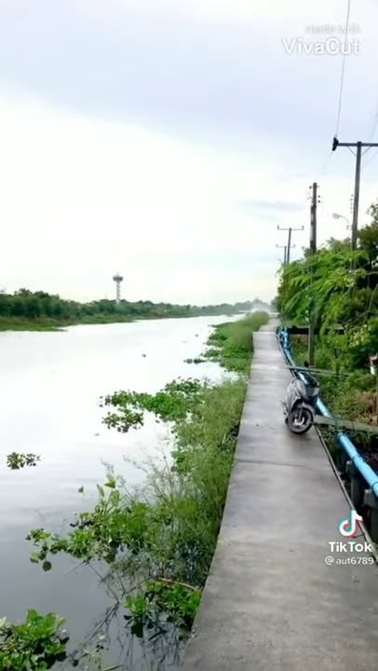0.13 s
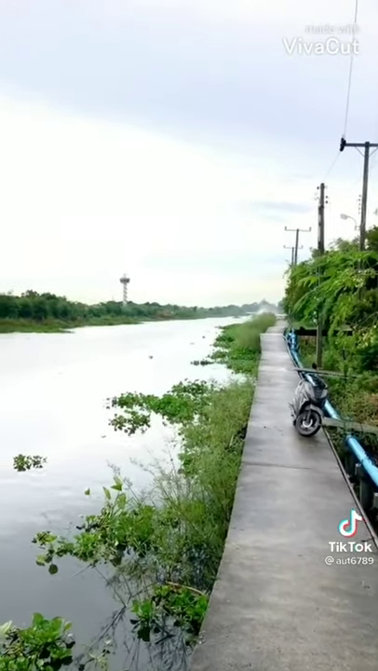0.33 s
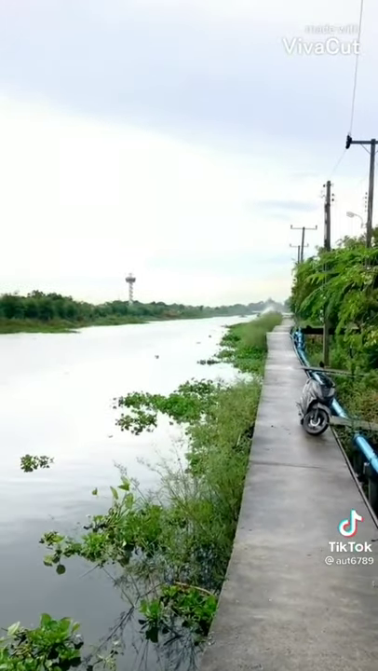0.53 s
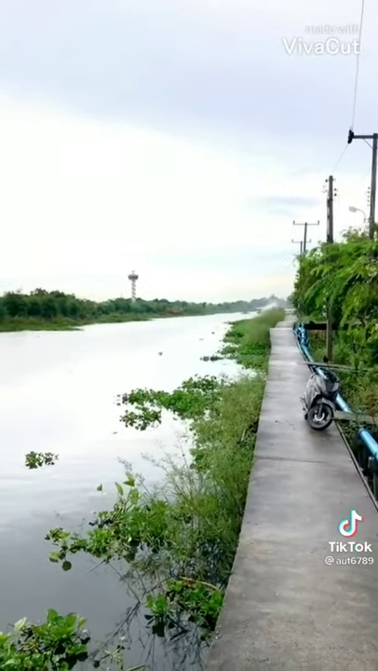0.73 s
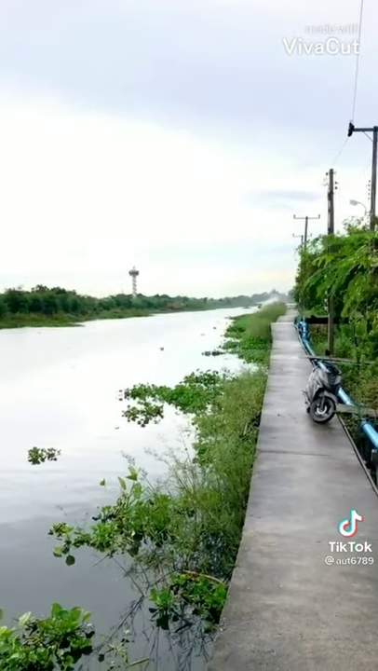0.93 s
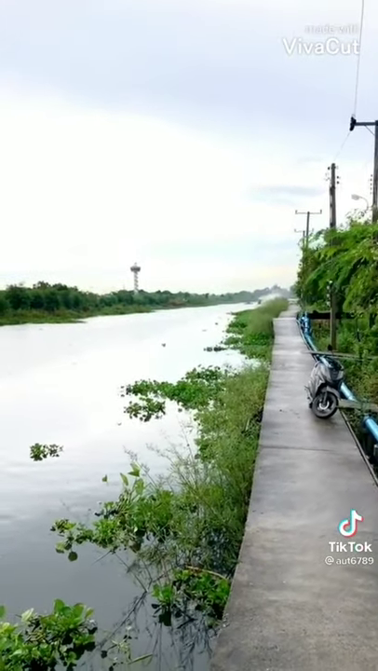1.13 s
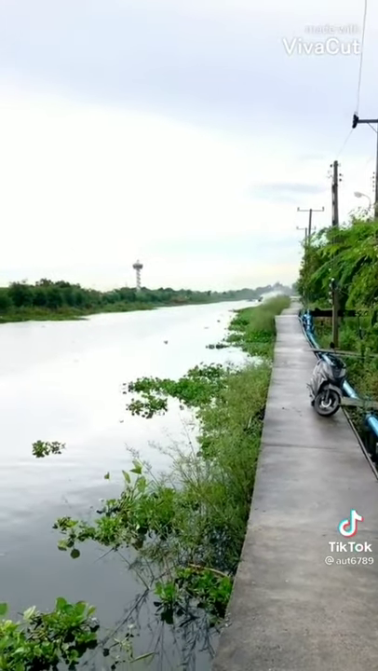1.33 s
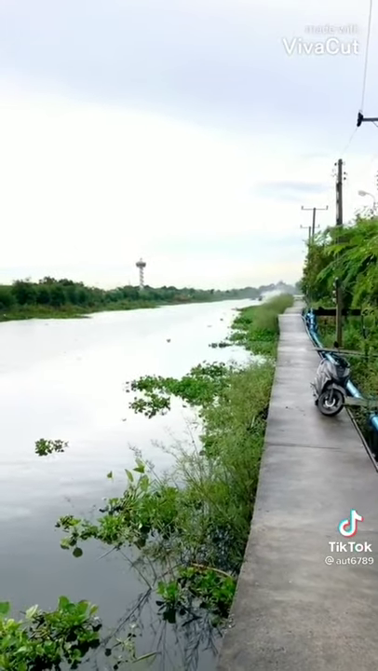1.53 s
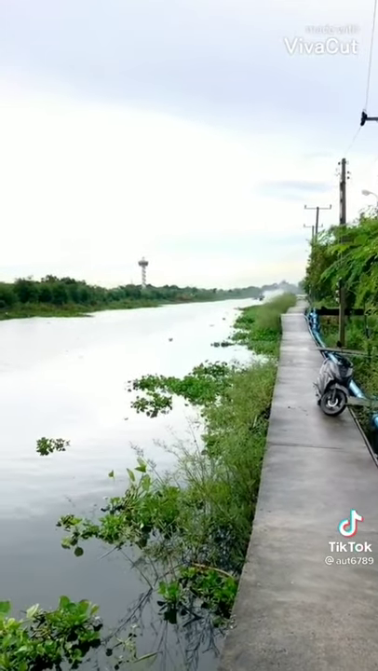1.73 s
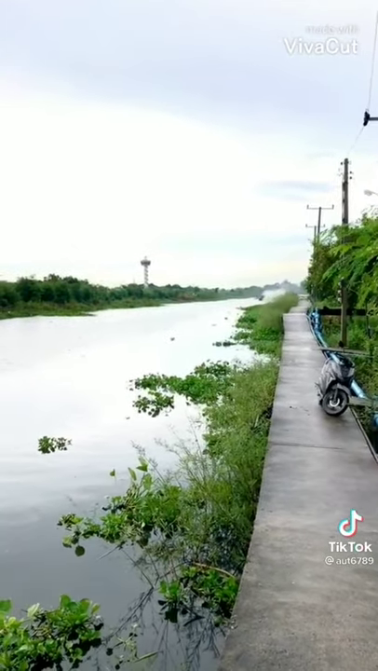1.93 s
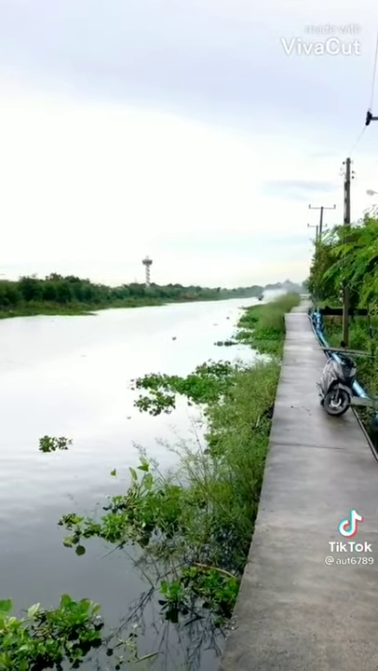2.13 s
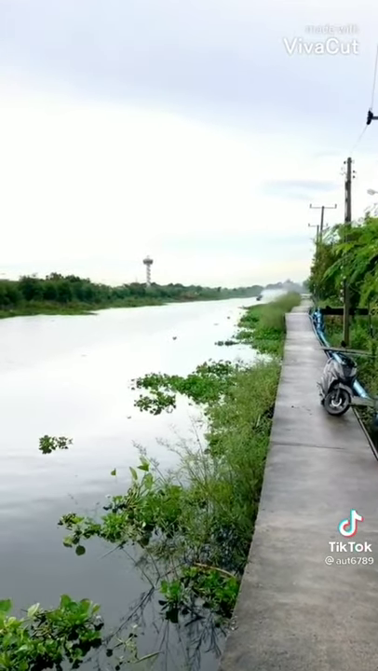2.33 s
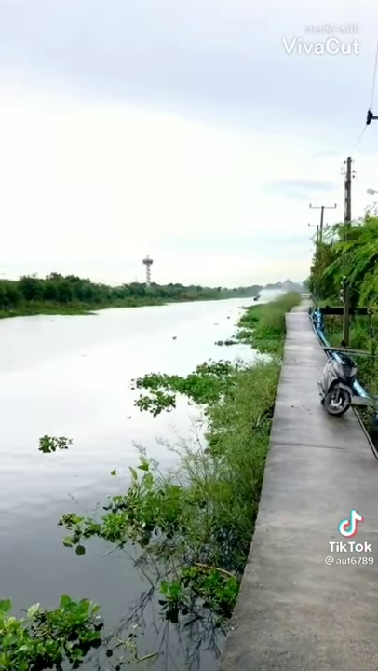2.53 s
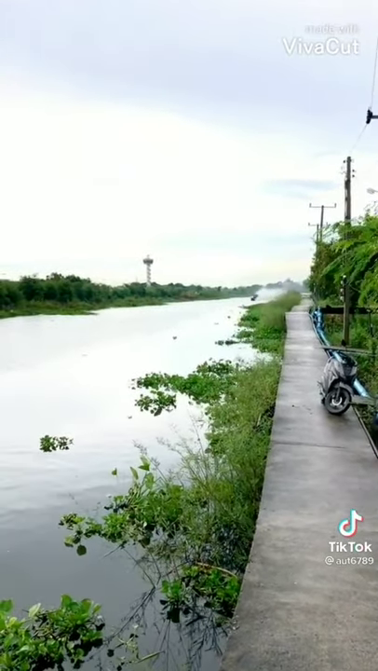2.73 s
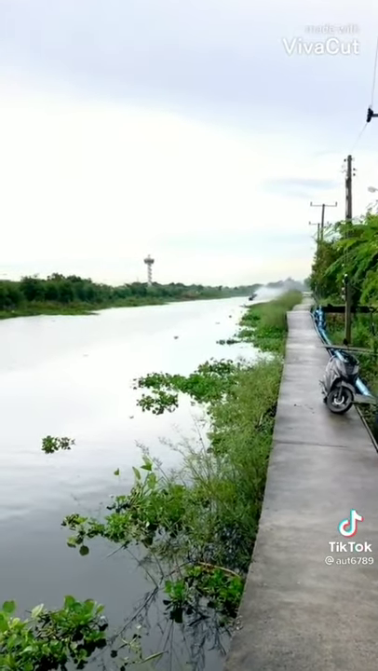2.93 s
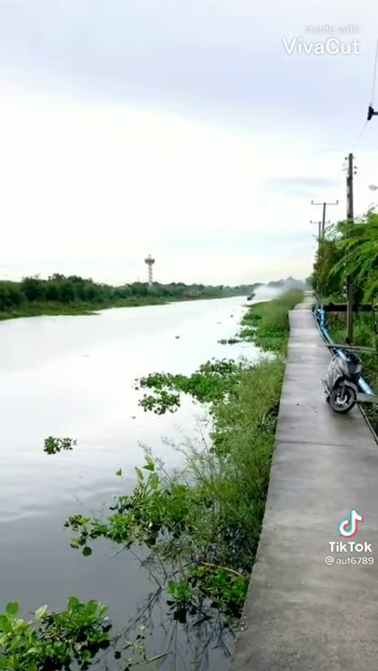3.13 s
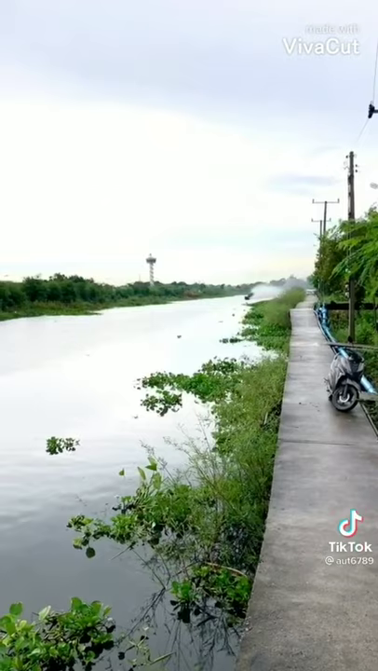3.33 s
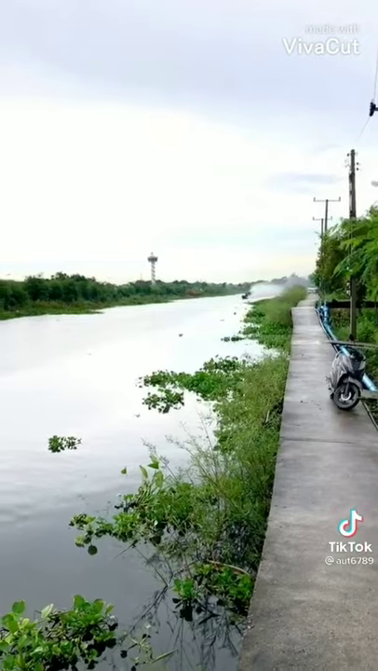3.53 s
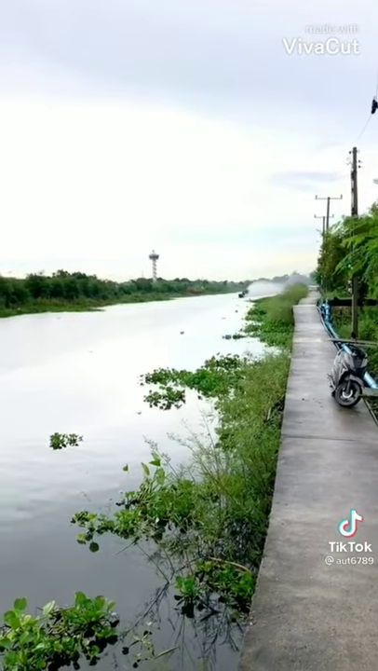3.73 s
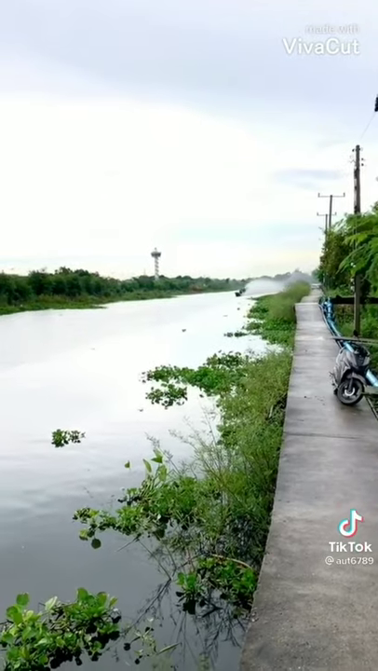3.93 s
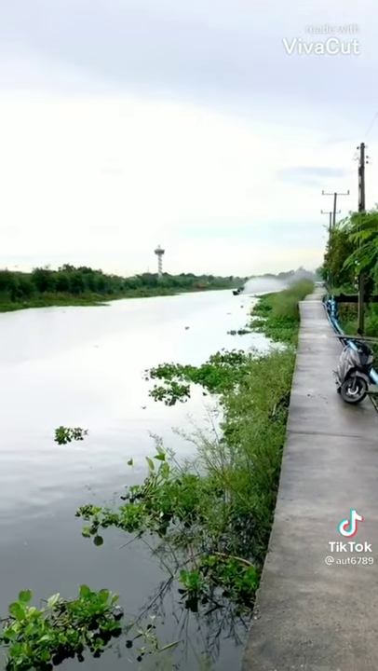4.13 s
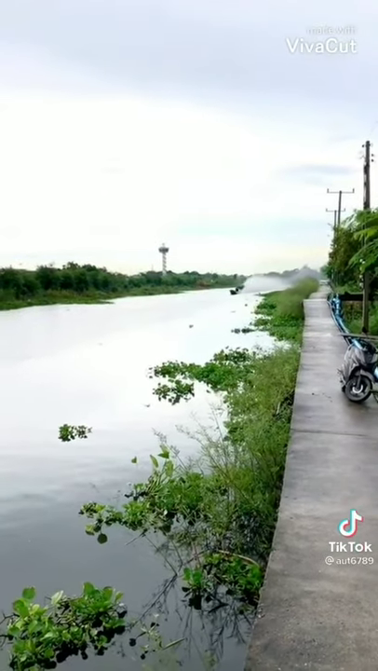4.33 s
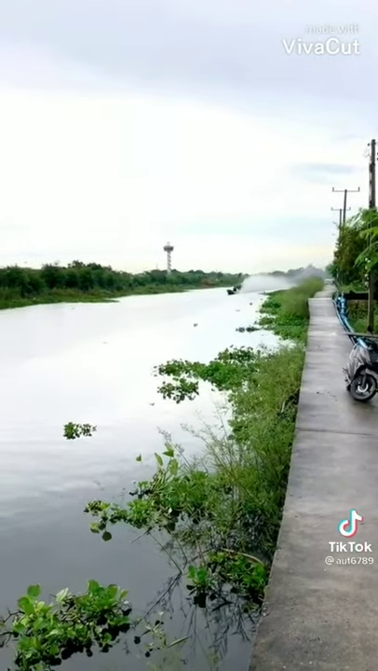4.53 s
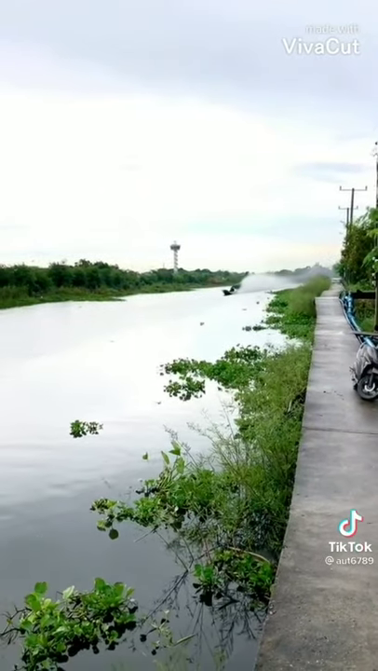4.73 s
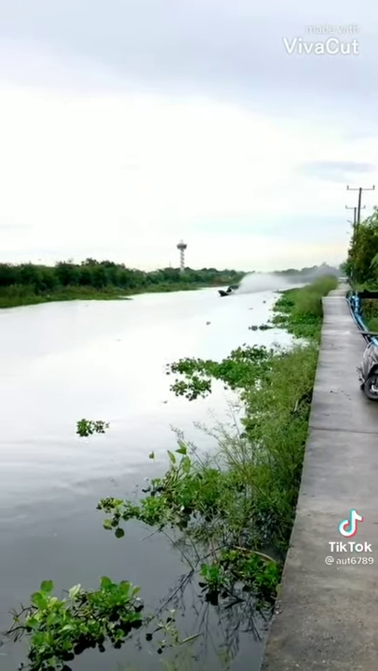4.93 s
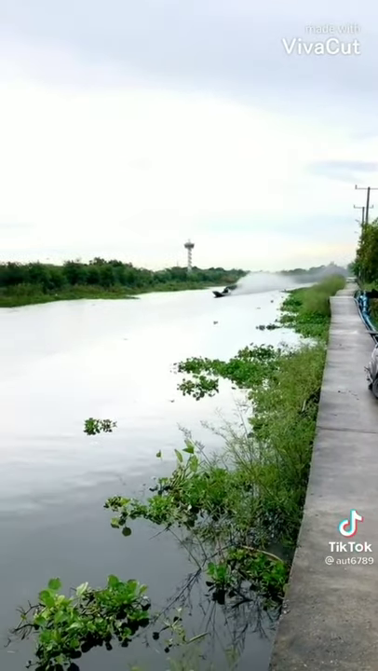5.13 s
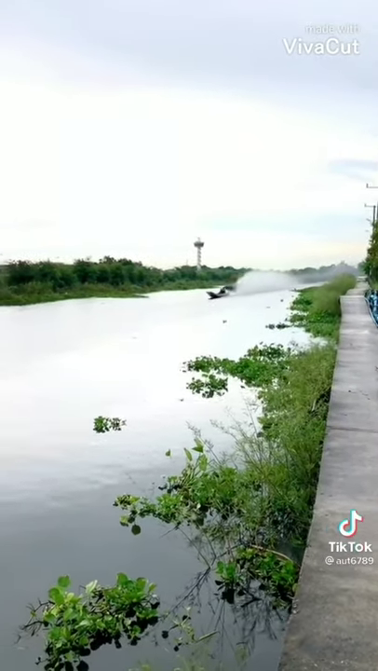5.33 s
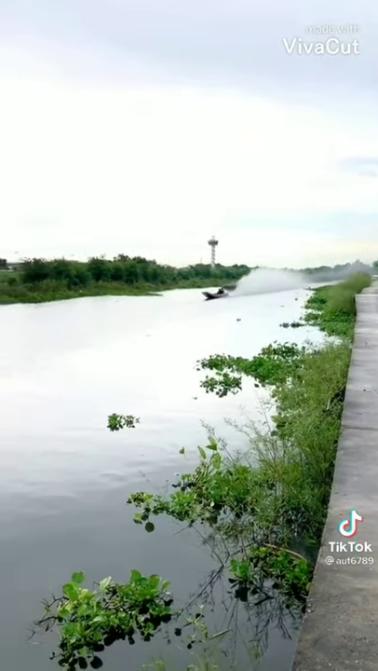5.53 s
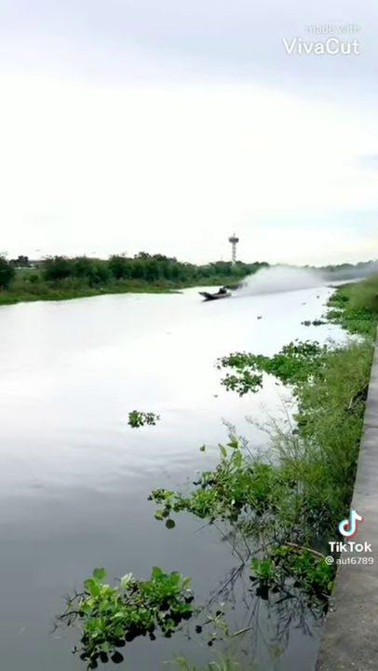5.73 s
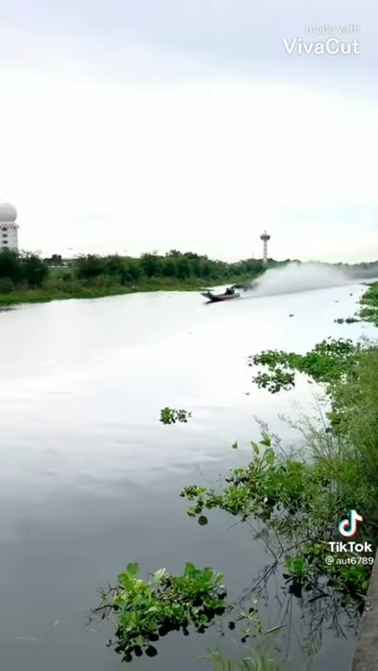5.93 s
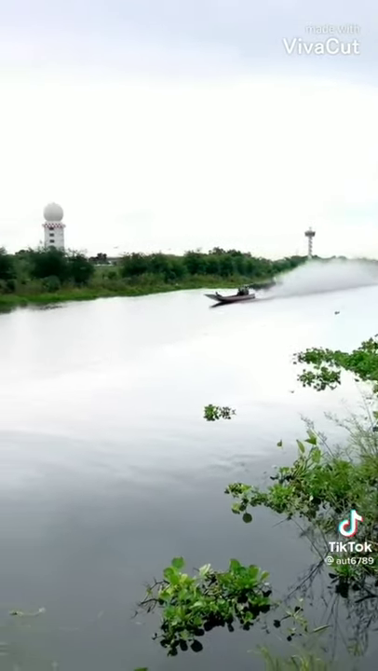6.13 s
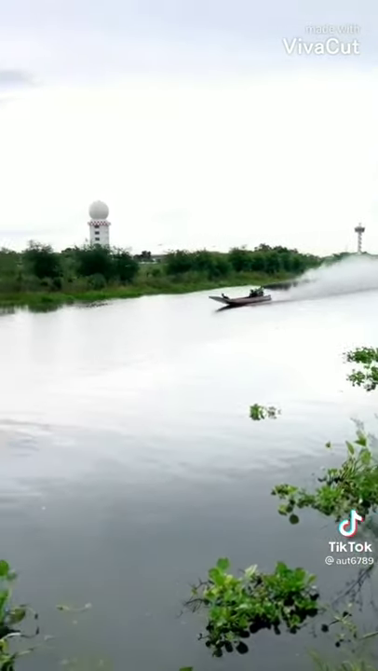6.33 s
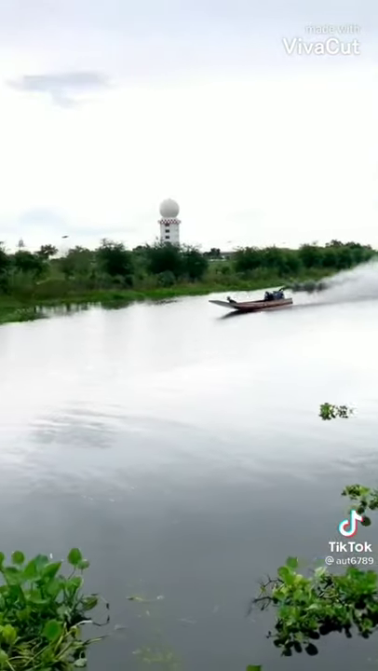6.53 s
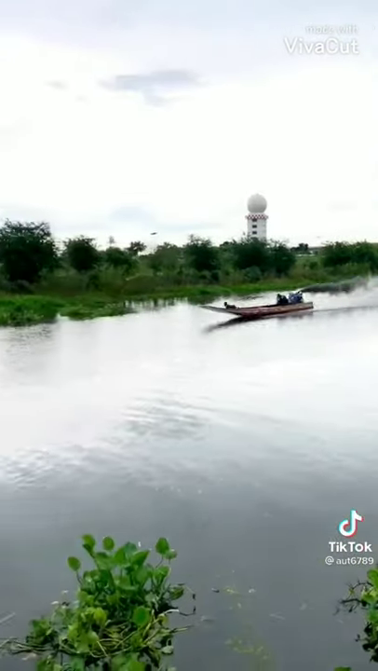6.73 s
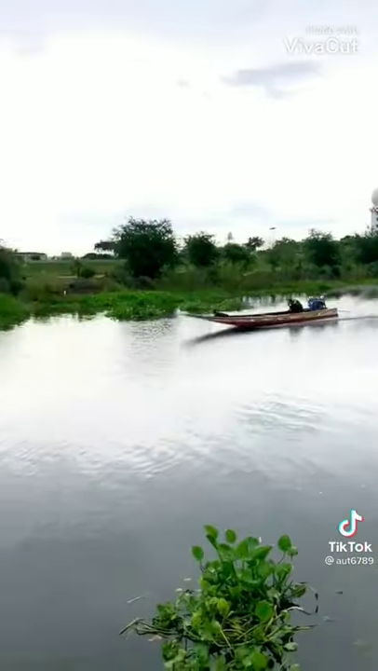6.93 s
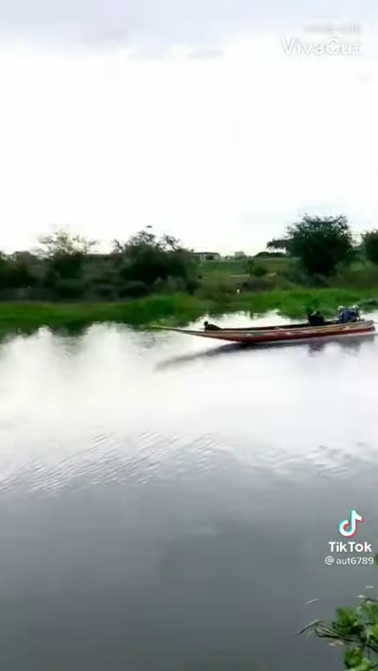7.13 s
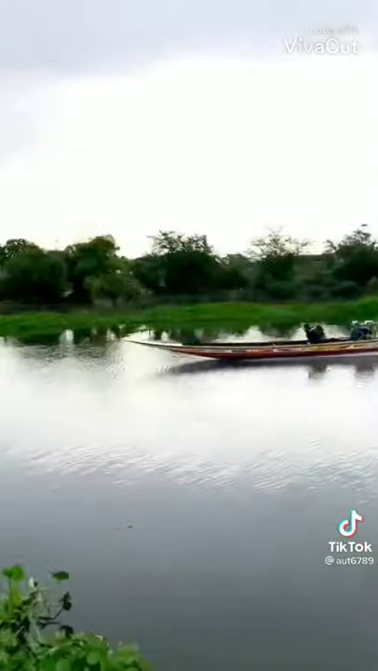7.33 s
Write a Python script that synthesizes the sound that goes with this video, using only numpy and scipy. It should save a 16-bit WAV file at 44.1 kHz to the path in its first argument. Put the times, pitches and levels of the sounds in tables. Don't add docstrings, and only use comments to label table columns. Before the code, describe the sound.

Outdoors on a canal bank, a phone microphone hears a few tiny leaf ticks and a faint, steady engine drone far off. The pitch creeps upward as a fast boat approaches. Thin turbo whistles glint through midway, then vanish. Roar and hissing spray swell, brighten and flutter until the boat passes close, very loud, its pitch sagging slightly at the end.

```python
import sys
import numpy as np
from scipy import signal
from scipy.fft import rfft, irfft
from scipy.io import wavfile
from scipy.ndimage import uniform_filter1d

SR = 44100
rng = np.random.default_rng(int(sys.argv[2]) if len(sys.argv) > 2 else 0)


def how_loud(loudness_db):
    steps = np.asarray(loudness_db, float) / 20
    return 10 ** steps


def digitize_waveform(pressure):
    field = np.atleast_2d(pressure).T
    bounded = np.clip(field, -1, 1)
    quanta = np.round(bounded * 32767).astype(np.int16)
    wavfile.write(sys.argv[1], SR, quanta)


N = 329868

# start in seconds, level in dB.
LEAF_TICKS = [
    (0.1376, -56),
    (0.6294, -68),
    (0.9055, -54),
    (1.2492, -66),
]
# time in seconds, firing rate in Hz, loudness at the bank in dB.
APPROACH = [(0, 158.7, -55), (.4, 162.2, -54), (.8, 166.8, -53.5), (1.5, 172.8, -51.5), (2.2, 178, -50),
            (3, 185.7, -47.5), (3.7, 191.9, -43.5), (4.3, 194, -40), (4.65, 196.9, -36),
            (4.9, 198.7, -32.5), (5.15, 197.5, -29.5), (5.8, 197.2, -27), (6.4, 197.1, -22),
            (6.7, 196.9, -18.5), (6.95, 195, -18.5), (7.15, 190.5, -19), (7.35, 187.3, -17),
            (7.48, 187.2, -18.5)]
# centre in seconds, half length in seconds, dB.
HULL_SLAPS = [(4.33, .02, 0.5), (4.66, .04, 1.5), (5.13, 0.046, 2), (5.28, .05, -1), (6.47, .03, -1.5),
              (6.79, .03, 2.5), (6.83, 0.013, -3.5), (6.86, .012, 2), (6.96, 0.017, -1), (7.31, 0.02, 0),
              (7.35, 0.005, -4), (7.38, 0.011, -2.5), (7.44, 0.018, -1)]

# time in seconds, shaft rate in Hz.
TURBO_SHAFT = [
    (.6, 2450),
    (1.8, 2532),
    (2.4, 2573),
    (3.0, 2602),
    (4.2, 2634),
    (5.15, 2640),
    (5.3, 2626),
    (5.8, 2624),
]
# time in seconds, whistle level in dB.
INTAKE_FACING = [
    (.6, -88),
    (2.1, -77),
    (3.3, -60),
    (3.92, -58),
    (4.05, -48.5),
    (4.6, -46.5),
    (5.05, -36.5),
    (5.5, -40),
    (5.62, -55),
    (5.8, -79),
]
# centre in seconds, half length in seconds, lift in dB.
WHISTLE_GLINTS = [
    (4.08, .06, 7),
    (4.35, .15, -4),
    (4.64, 0.039, 7),
    (4.82, .06, 7),
    (4.98, .04, 5),
    (5.13, 0.029, 13),
    (5.3, 0.021, 8),
    (5.5, .03, 9),
]

# frequency in Hz, level in dB per Hz.
FAR_SPRAY = [(700, -23), (1150, 1.5), (1400, 0.5), (1650, 0), (1900, -2.5), (2150, -4.5), (2550, -2.5),
             (3000, -4.5), (4600, -8.5), (7300, -15.5), (8600, -18.5), (10500, -31.5), (12000, -43),
             (15400, -58)]
# frequency in Hz, level in dB per Hz.
NEAR_SPRAY = [(700, -29), (1150, -1), (1400, -1), (1650, -3.5), (1900, -2.5), (2150, -5), (2600, -2.5),
              (3000, -4), (3700, -5.5), (6000, -9), (8600, -6.5), (10500, -11), (13800, -16), (15400, -21)]
# loudness in dB, share of the near colour (0 to 1, beyond extrapolates).
SPRAY_NEARNESS = [(-58, -1.06), (-47, 0.29), (-35.5, 0.57), (-28.5, 0.64), (-9.5, 1.)]
# start in seconds, lift in dB.
CLEAR_GUSTS = [(4.814, 7.5), (4.9694, 5), (5.072, 5), (5.2097, 0), (5.3794, 3.5), (5.4895, 2),
               (6.1694, 2.5), (6.2158, 4.5), (6.6095, 4), (7.1137, 2), (7.228, 9), (7.2994, -4),
               (7.3616, 0)]
# centre in seconds, half length in seconds, dB.
TREBLE_VEILS = [
    (4.7, .05, -2),
    (4.92, .03, -4),
    (5.12, .06, 0.5),
    (5.3, 0.051, -2),
    (5.7, 0.094, -1.5),
    (5.95, .08, 1),
    (7.35, 0.18, 2),
]
# centre in seconds, half length in seconds, lift in dB.
PIPE_FACING = [
    (1.6, 0.89, 1.8),
    (4.4, 0.042, 4.7),
    (5.6, 0.32, 3),
    (6.62, 0.016, 6.8),
    (7.3, 0.29, 5.1),
]

# frequency in Hz, level in dB per Hz.
FAR_ROAR = [(26, -33), (45, -4), (81, 1.5), (145, -1.5), (180, -7.5), (214, -4), (332, -13.5), (383, -17.5),
            (490, -17.5), (619, -19.5), (704, -20), (1000, -24), (1300, -42), (2200, -120)]
# frequency in Hz, level in dB per Hz.
NEAR_ROAR = [(26, -54), (45, -21.5), (113, -13.5), (145, -9.5), (192, -1.5), (249, -9), (315, -11),
             (378, -4), (425, -8), (643, -8), (714, -13.5), (792, -12.5), (1000, -15.5), (1300, -24),
             (2200, -120)]
# loudness in dB, share of the near colour (0 to 1).
ROAR_NEARNESS = [(-51, 0.), (-42.5, 0.35), (-24, 0.8), (-22, 0.93)]

# multiple of the firing rate, level in dB.
UPPER_ORDERS = [(3, -1.5), (4, -5), (5, -18.5), (6, -26.5)]
# multiple of the firing rate, level in dB.
HALF_ORDERS = [(.5, -3), (1.5, -2.5), (2.5, -4), (3.5, -9.5), (4.5, -17)]
# centre in seconds, half length in seconds, dB.
FIRING_ECHO = [(.25, 0.62, 12.5), (.8, 0.13, -9), (1.4, 0.29, 4), (2.1, .35, 4.5), (2.7, 0.17, 4),
               (3.3, 0.21, 7.5), (4.08, .18, -15), (4.62, 0.095, 4), (5.6, .3, -6), (6.0, .05, -8),
               (6.3, .17, 4), (6.53, 0.036, -2.5), (6.88, .04, -12), (7.12, 0.052, -2.5), (7.38, .1, -20)]
# centre in seconds, half length in seconds, dB.
SECOND_ORDER_ECHO = [
    (1.15, .3, -3),
    (2.2, 0.5, 0),
    (3.3, .3, 3.5),
    (4.6, 0.13, -6.5),
    (5.45, 0.093, -5),
    (6.75, .18, -22),
    (7.25, .3, -9),
]
# centre in seconds, half length in seconds, dB.
UPPER_ORDERS_ECHO = [
    (.35, 0.44, 5),
    (1.5, 0.64, -12),
    (2.5, 0.33, -15),
    (3.301, .15, -6),
    (4.3, 0.32, 4),
    (5.6, 0.48, 2),
    (6.25, 0.4, 6),
    (7.05, 0.35, -18),
]
# centre in seconds, half length in seconds, dB.
HALF_ORDERS_ECHO = [
    (.7, 1, -9),
    (2.2, 0.24, -8),
    (2.62, 0.068, -15),
    (3.8, 0.65, 5.5),
    (4.95, 0.11, -6),
    (6.0, 0.13, -13),
    (6.65, 0.24, -12),
    (7.3, 0.34, -18),
]


def evened(x):
    return x / np.sqrt(np.mean(x ** 2) + 1e-20)


def read_spectrum(points, hz):
    f, db = np.transpose(points)
    return np.interp(np.log(hz + 1), np.log(f + 1), db, left=-90, right=-90)


def columns(rows, t):
    s, *values = np.transpose(rows)
    return [np.interp(t, s, v) for v in values]


def bumps(rows, t):
    return sum(db * np.exp(-((t - s) / half_s) ** 2) for s, half_s, db in rows)


def drift(size, top_hz, rate=SR):
    spectrum = rfft(rng.standard_normal(size))
    hz = np.fft.rfftfreq(size, 1 / rate)
    return evened(irfft(spectrum / (1 + (hz / top_hz) ** 2), size))


def scattered(turns, share, top_hz):
    paths = (drift(N, top_hz) + 1j * drift(N, top_hz)) * np.sqrt(share / 2)
    straight = np.sqrt(1 - share)
    return np.sqrt(2) * ((straight + paths) * np.exp(2j * np.pi * turns)).real


def loudness(t):
    return columns(APPROACH, t)[1]


def spray_level(t):
    return loudness(t) + 0.92 * bumps(HULL_SLAPS, t)


def roar_level(t):
    over_spray_db, away_s, away_db_per_s = 6.5, 6.94, -7.5
    return loudness(t) + over_spray_db + away_db_per_s * np.maximum(t - away_s, 0) + bumps(HULL_SLAPS, t)


def wash(level, clears, far, near, band, size, patchy_db, gust_db, gust_hz):
    hop = size // 4
    frames, hz = N // hop + 5, np.fft.rfftfreq(size, 1 / SR)
    t = np.arange(frames) * hop / SR
    nearness = columns(clears, loudness(t))[0]
    far_db, near_db = read_spectrum(far, hz)[:, None], read_spectrum(near, hz)[:, None]
    colour = how_loud(far_db * (1 - nearness) + near_db * nearness)
    inside = (hz > band[0]) & (hz < band[1])
    colour /= np.sqrt((colour[inside] ** 2).sum(0))
    a, b, patches = rng.standard_normal((frames, len(hz), 3)).T
    patches = uniform_filter1d(patches, size=9, axis=0)
    patches = evened(uniform_filter1d(patches, size=12, axis=1))
    treble_weight = np.log2(1 + hz / 2500)[:, None]
    gusts = gust_db * treble_weight * drift(frames, gust_hz, SR / hop)
    z = (a + 1j * b) * colour * how_loud(level(t) + patchy_db * patches + gusts)
    return signal.istft(z, nperseg=size, noverlap=size - hop)[1][:N] * 4 / 3


def ticks():
    out, t = np.zeros(N), np.arange(200) / SR
    for s, db in LEAF_TICKS:
        crackle = np.diff(rng.standard_normal(201))
        out[round(s * SR):][:200] += how_loud(db - 9 - 60 * t / .008) * crackle
    return out


def turbo():
    t = np.arange(N) / SR
    turns = np.cumsum(columns(TURBO_SHAFT, t)[0]) / SR
    facing_db = columns(INTAKE_FACING, t)[0]
    high_db = -64. + 1.3 * (facing_db + 39) + bumps(WHISTLE_GLINTS, t) + 3. * drift(N, 15)
    orders = ((1, facing_db - 6.0), (2, facing_db - 2.5), (3, facing_db - 16.0), (5, high_db + 2.0))
    out = np.zeros(N)
    for k, db in orders:
        out += how_loud(db) * scattered(k * turns, share=.5, top_hz=22. * k)
    return out * (t > .6) * (t < 5.8)


def spray(turns):
    t = np.arange(N) / SR
    near = np.interp(t, [4.2, 7.3], [.25, 1.05])
    puffs = 1 + near * (0.12 * np.cos(2 * np.pi * turns) + 0.018 * np.cos(np.pi * turns / 2))
    tearing = drift(N, 53.0) * np.sqrt(.7) + 0.6 * drift(N, 3.3)
    bursts = how_loud(near * 2.02 * tearing)
    noise = wash(spray_level, SPRAY_NEARNESS, FAR_SPRAY, NEAR_SPRAY, (1200, 5000), size=512,
                 patchy_db=0.88, gust_db=0.17, gust_hz=25.)
    treble = signal.sosfilt(signal.butter(2, 4500., "highpass", fs=SR, output="sos"), noise)
    lift_db = sum(db * np.exp(-((t - s - .004) / .009) ** 2) for s, db in CLEAR_GUSTS)
    lift_db = lift_db + bumps(TREBLE_VEILS, t)
    pipe = sum(signal.lfilter(*signal.iirpeak(hz, hz / 180, SR), noise) for hz in (1630, 2610))
    noise = noise + (how_loud(bumps(PIPE_FACING, t)) - 1) * pipe
    return how_loud(-1.0) * puffs * bursts * (noise + (how_loud(lift_db) - 1) * treble)


def firing():
    hz = columns(APPROACH, np.arange(N) / SR)[0]
    return np.cumsum(hz * (1 + 0.0043 * drift(N, 10.5))) / SR


def roar(turns):
    t = np.arange(N) / SR
    puffs = evened(1 + 0.028 * np.cos(2 * np.pi * turns) + 0.12 * np.cos(np.pi * turns))
    noise = wash(roar_level, ROAR_NEARNESS, FAR_ROAR, NEAR_ROAR, (230, 1000), size=2048,
                 patchy_db=-0.4, gust_db=0.5, gust_hz=2.2)
    fired = np.diff(np.floor(turns), prepend=0) * (rng.gamma(3., 1, N) - 3.)
    u = np.arange(-200, 201) / SR / .00045
    push = (1 - u ** 2) * np.exp(-u ** 2 / 2)
    kicks = evened(signal.oaconvolve(fired, push, "same"))
    heard_db = np.interp(t, [3., 6.], [-16., -10.])
    return how_loud(-1.87) * puffs * noise + how_loud(roar_level(t) + heard_db) * kicks


def exhaust(turns):
    t = np.arange(N) / SR
    out = how_loud(3.5 + bumps(FIRING_ECHO, t)) * scattered(turns, share=0.06, top_hz=25.)
    # orders, level over the spray in dB, echo off the water
    families = (([(2, 0.)], -1, SECOND_ORDER_ECHO),
                (UPPER_ORDERS, -6.5, UPPER_ORDERS_ECHO),
                (HALF_ORDERS, -3.5, HALF_ORDERS_ECHO))
    for orders, db, echo in families:
        family = np.zeros(N)
        for k, k_db in orders:
            family += how_loud(k_db) * scattered(k * turns + .02 * k ** 2, share=.15, top_hz=4. * k)
        out += how_loud(db + bumps(echo, t)) * family
    return how_loud(loudness(t)) * out


def scene():
    turns = firing()
    return (ticks() + turbo() + spray(turns) + roar(turns) + exhaust(turns))[None]


def top_cut(x):
    return signal.sosfilt(signal.butter(12, 15420, fs=SR, output="sos"), x)


def record(dry):
    hiss_db = -82.5
    hiss = signal.lfilter(*signal.butter(2, 9500., fs=SR), rng.standard_normal(N))
    hissing = dry + how_loud(hiss_db + 15.5) * hiss
    cut = signal.sosfilt(signal.butter(4, 42., "highpass", fs=SR, output="sos"), hissing)
    limited = cut / (1 + abs(cut / .97) ** 4) ** .25
    return top_cut(limited)


dry = scene()
out = record(dry)
digitize_waveform(out)
```